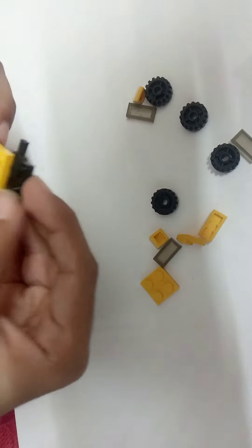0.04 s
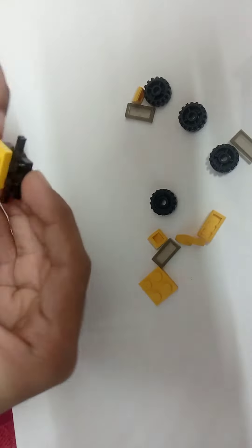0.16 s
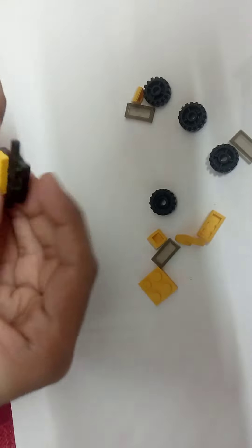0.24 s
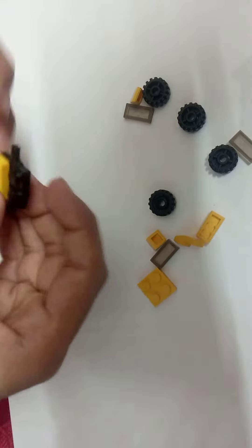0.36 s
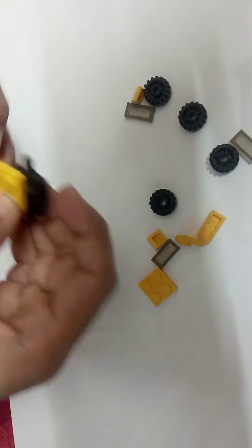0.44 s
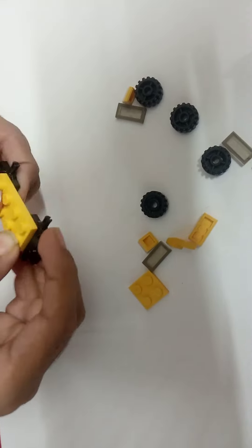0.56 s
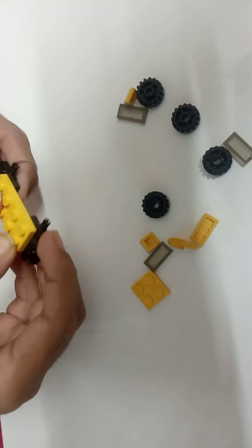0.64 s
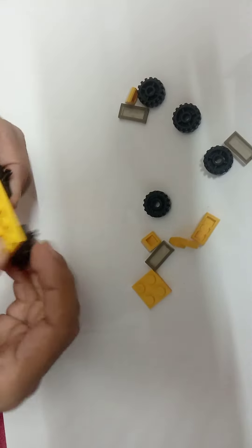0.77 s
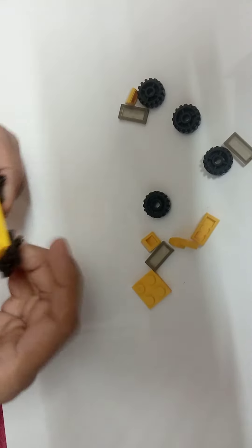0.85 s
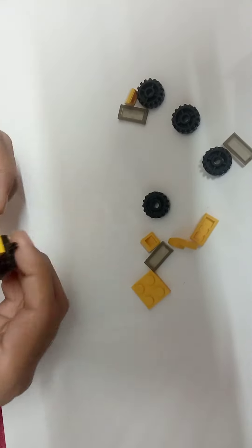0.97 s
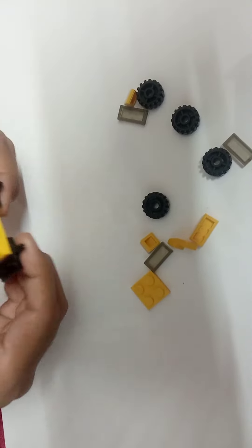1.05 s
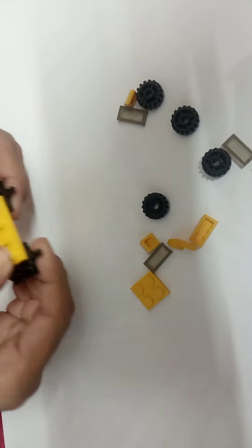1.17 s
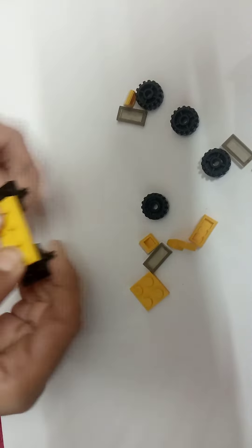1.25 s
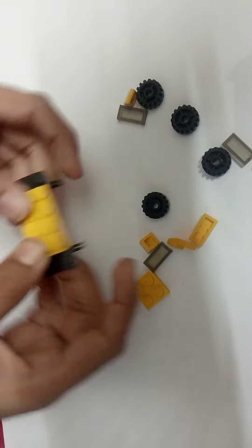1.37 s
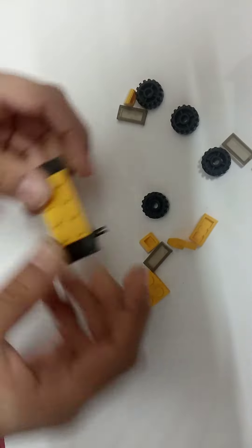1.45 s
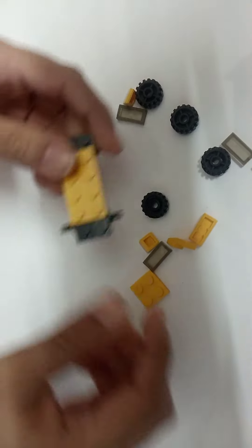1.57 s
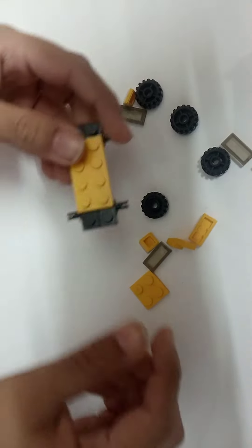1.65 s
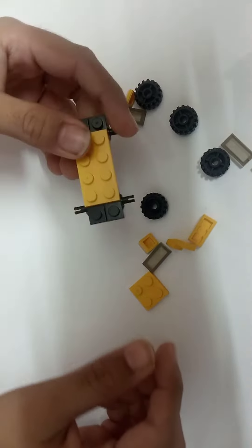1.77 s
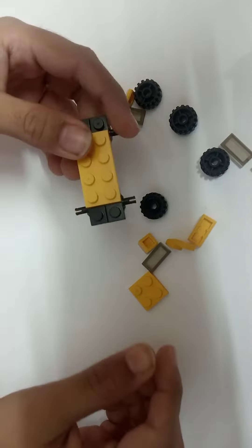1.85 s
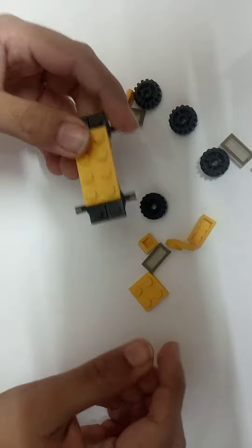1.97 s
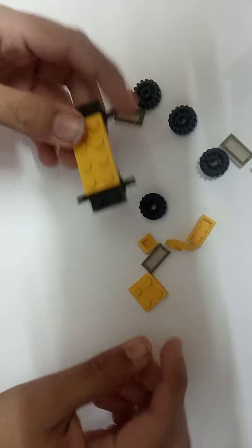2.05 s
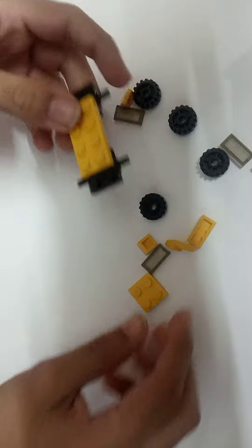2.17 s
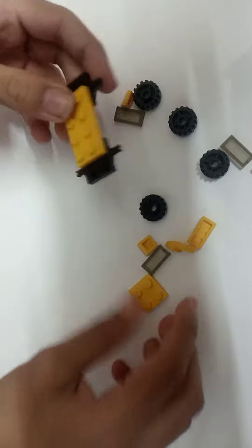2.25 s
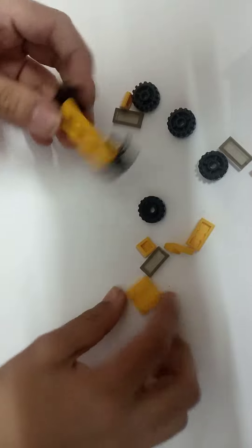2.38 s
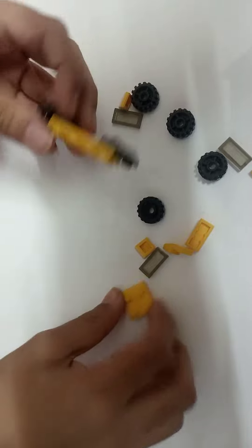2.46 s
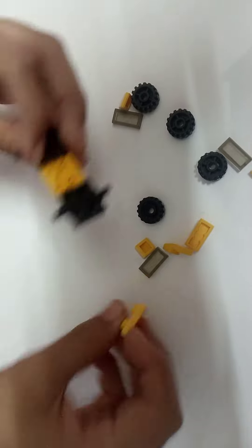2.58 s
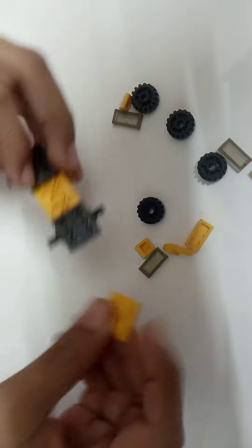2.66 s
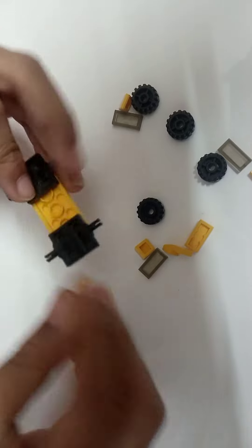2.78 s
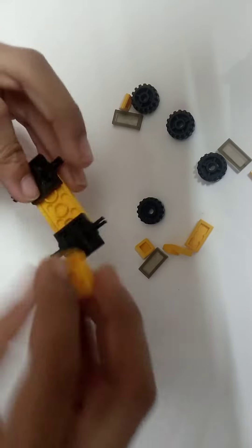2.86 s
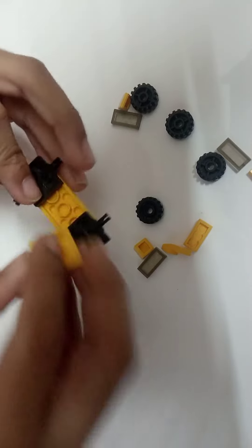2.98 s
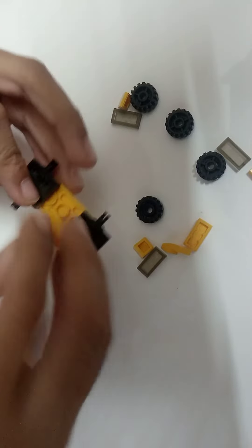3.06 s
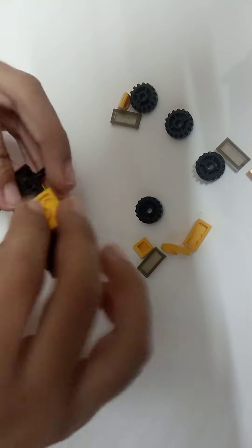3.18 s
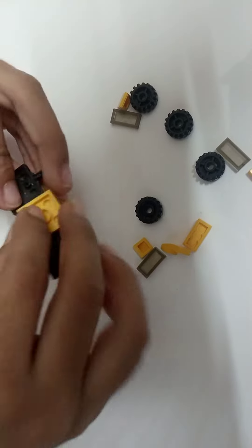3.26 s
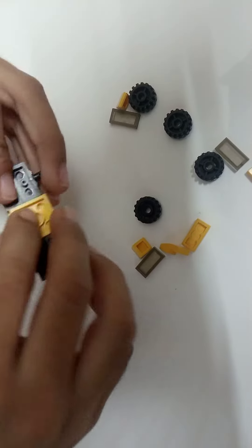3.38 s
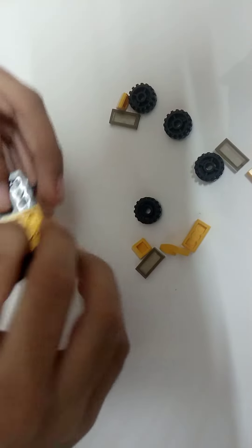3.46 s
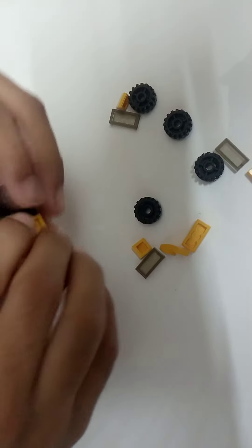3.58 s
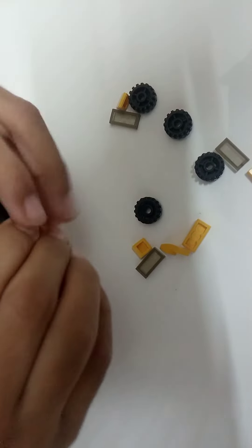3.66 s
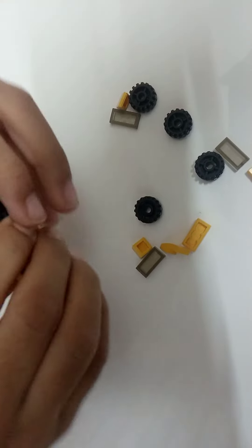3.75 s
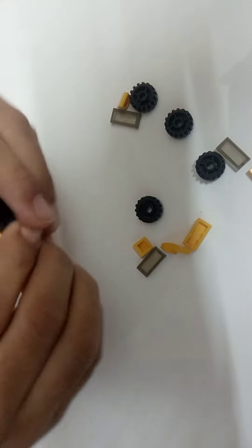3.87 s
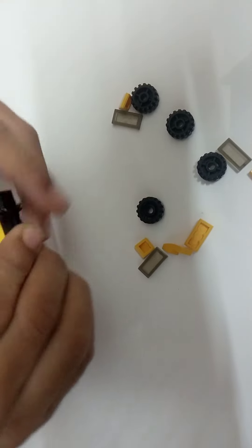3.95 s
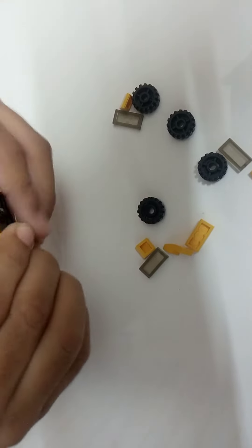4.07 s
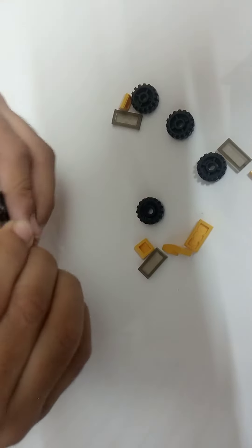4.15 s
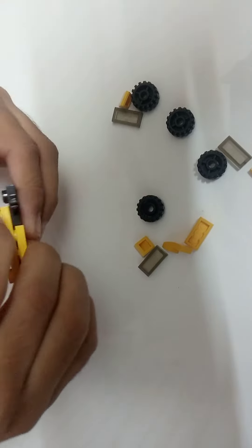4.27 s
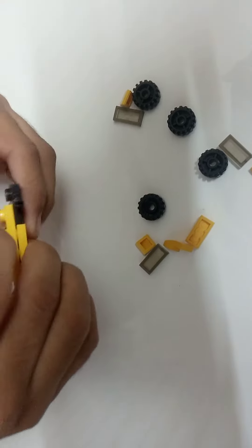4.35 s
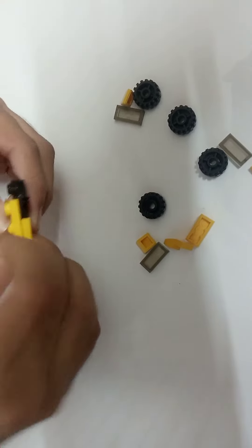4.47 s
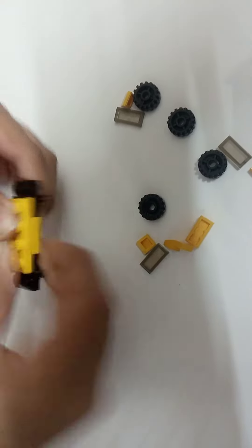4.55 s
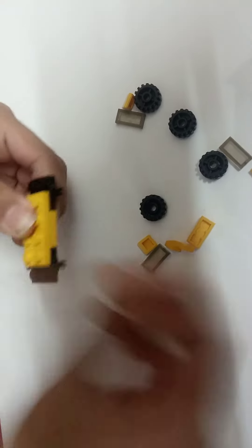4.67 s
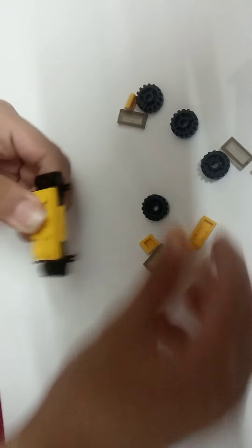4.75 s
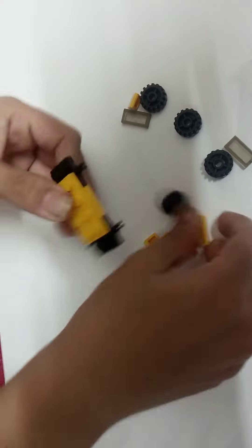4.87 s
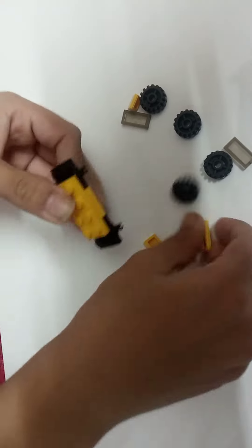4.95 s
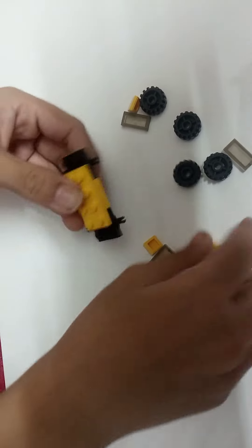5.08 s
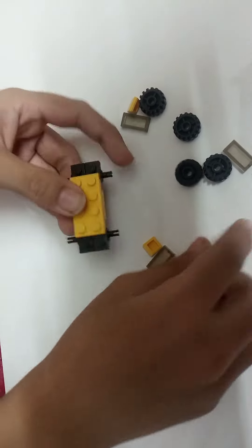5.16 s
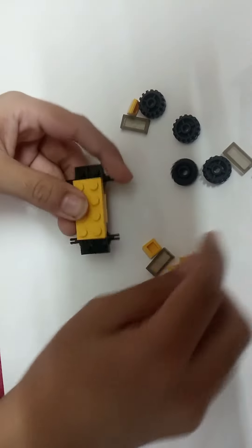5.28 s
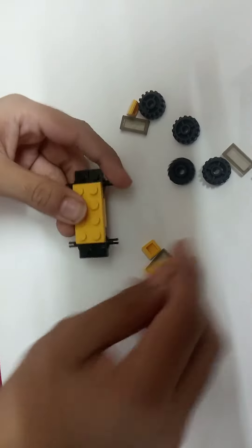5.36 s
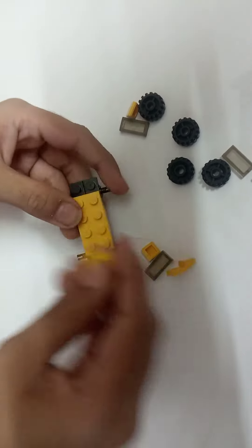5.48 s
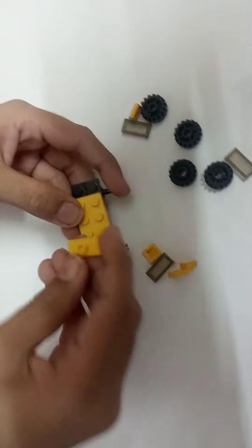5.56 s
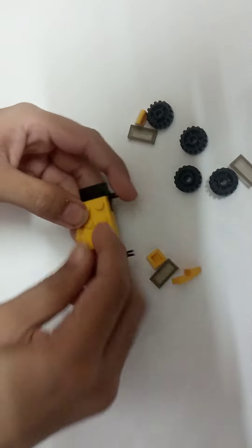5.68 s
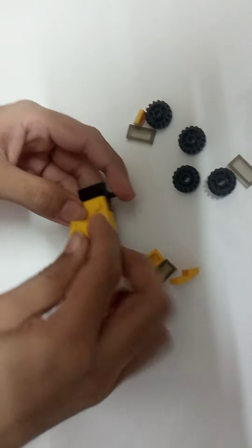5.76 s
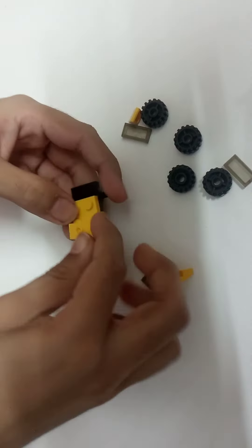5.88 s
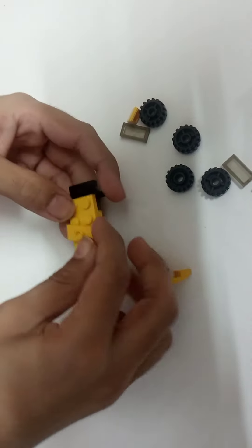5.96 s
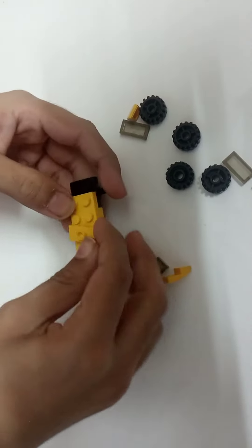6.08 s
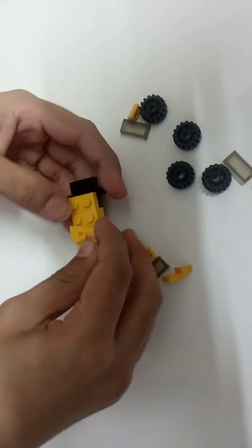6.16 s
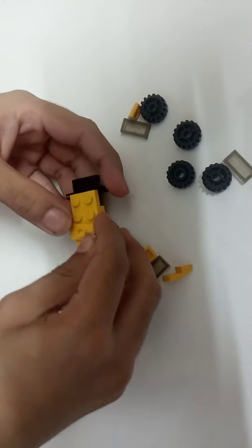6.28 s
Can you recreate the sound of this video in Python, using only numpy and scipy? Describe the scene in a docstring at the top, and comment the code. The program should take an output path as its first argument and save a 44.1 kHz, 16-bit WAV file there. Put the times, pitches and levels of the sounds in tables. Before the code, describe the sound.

Close to the microphone in a small quiet room, hands press plastic toy bricks together. Two sharp snaps open, then mostly faint clicks over a low hum and soft hand rumble. Around the middle come firmer snaps and a tiny squeak. Later, loose pieces clatter brightly on the tabletop, a plate bounces and chatters, a small wheel rocks to a stop, and two softer snaps follow.

```python
"""Toy bricks on a table

Hands press small plastic bricks together in a quiet room: studs snap as short noise cracks with a choked ring.
Loose pieces then clatter: each contact joins a brief crack to a burst of resonant tabletop noise.
A plate bounces and chatters to rest, a toy wheel rocks in shortening swings to a shudder.
Below lie soft squeaks, rubs and low bumps, a low electric hum, rumble and a thin high whine.
"""
import sys
import numpy as np
from scipy import signal
from scipy.fft import rfft, irfft, next_fast_len
from scipy.io import wavfile
from scipy.ndimage import uniform_filter1d, map_coordinates

SR = 44100
rng = np.random.default_rng(int(sys.argv[2]) if len(sys.argv) > 2 else 0)


def inscribe(sig):
    """Save sig as 16-bit PCM at rate SR to the path in sys.argv[1].

    A 1-D sig is mono; a 2-D sig holds one channel per row.
    Samples are clipped to [-1, 1] before scaling.
    """
    pcm = np.round(np.clip(np.atleast_2d(sig).T, -1, 1) * 32767)
    wavfile.write(sys.argv[1], SR, pcm.astype(np.int16))


N = 278928  # samples

# Background rumble. Each row: time in seconds, level in dB before RUMBLE_TRIM_DB.
RUMBLE_LEVEL = [(0.0, -70), (0.16, -66.5), (0.48, -72.5), (0.61, -68), (1.09, -62.5), (1.81, -67),
                (2.53, -61), (2.96, -67), (6.25, -70), (6.32, -75.5)]
# Rumble of moving hands. Each row: time in seconds, level in dB before HANDS_TRIM_DB and flutter.
HAND_MOTION_LEVEL = [(0.0, -76.5), (0.98, -82), (1.25, -66), (1.81, -64), (1.94, -71.5), (2.57, -62),
                     (2.96, -66.5), (3.01, -72), (3.38, -65.5), (3.55, -80), (4.37, -65), (4.7, -81),
                     (4.86, -64.5), (4.96, -91), (5.53, -70.5), (5.58, -90), (6.25, -76), (6.32, -91)]
# High whine. Each row: time in seconds, level in dB before its waver.
WHINE_LEVEL = [(0, -89.5), (.6, -85), (2.6, -84.5), (4.2, -83.5), (4.7, -88), (6.32, -93.5)]
# Brief dips of hum and rumble. Each row: start in seconds, length in seconds, depth in dB.
BACKGROUND_DIPS = [(0.361, .17, -12), (.67, 0.25, -7), (2.94, 0.28, -8), (4.703, 0.085, -8.5),
                   (4.866, 0.18, -8)]
# Electric hum. Each row: frequency in Hz, level in dB relative to HUM_DB, waver in dB.
HUM_PARTIALS = [(147.1, 0, 0.24), (194, -6, 2.5)]
# Spectrum of the room's rumble. Each row: frequency in Hz, relative density in dB per Hz.
RUMBLE_SPECTRUM = [(20, -37.5), (45, -18), (70, -13), (100, 0), (130, 2), (175, -5), (240, -21),
                   (330, -33.5), (600, -64)]
# Spectrum of the hands' rumble. Each row: frequency in Hz, relative density in dB per Hz.
HANDS_SPECTRUM = [(90, -31.5), (160, -5), (210, 6.5), (250, -2), (290, -13), (345, -31), (600, -68)]
# Spectrum of the hiss. Each row: frequency in Hz, relative density in dB per Hz.
HISS_SPECTRUM = [(100, 3), (400, -0.5), (800, -8), (2000, -10.5), (6000, -13), (8000, -17), (15000, -17.5)]
# Decay of the room's tail. Each row: frequency in Hz, T60 in seconds.
TAIL_T60 = [(500, 0.6), (2800, 0.18), (5000, 0.27), (9000, 0.2), (12000, 0.2), (15000, 0.14)]
# Colour of the room's echo and tail. Each row: frequency in Hz, gain in dB.
ROOM_COLOUR = [(500, -5), (3000, 0), (6000, -2), (9500, 0), (12500, -10), (16000, -14)]
# Faint squeaks. Each row: start in seconds, length in seconds, centre in Hz, level in dB.
FAINT_SQUEAKS = [(.44, 0.085, 2170, -83.5), (.515, 0.048, 2106, -84.5), (1.28, 0.11, 7340, -82.5),
                 (2.76, 0.087, 10400, -85), (2.9, 0.081, 7450, -87), (2.99, 0.11, 7400, -74.5),
                 (3.49, 0.19, 2816, -83.5), (3.49, 0.2, 3900, -89.5), (3.52, 0.14, 1934, -84),
                 (3.55, 0.13, 4600, -91), (3.54, 0.18, 1280, -80.5), (3.66, 0.077, 6490, -84)]
# Short noise swells: fingers rubbing over bricks, and the hollow knock of one snap.
# Each row: start in seconds, length in seconds, centre in Hz, level in dB.
SHORT_SWELLS = [(.135, 0.072, 4200, -76), (1.18, 0.068, 14500, -74.5), (1.2, 0.039, 5950, -80),
                (3.379, 0.00766, 2986, -47.5), (4.06, 0.037, 5080, -75), (4.167, 0.028, 4630, -69),
                (4.49, 0.021, 6700, -69)]
# Soft low bumps: hands, and the low body of a snap and a tap.
# Each row: start in seconds, length in seconds, centre in Hz, level in dB.
LOW_BUMPS = [(.57, 0.12, 60, -63.5), (1.02, 0.155, 62, -62), (1.7, .2, 58, -69), (2.328, 0.031, 640, -70.5),
             (2.37, .14, 51.5, -63.5), (4.252, 0.013, 1290, -63.5), (4.768, 0.036, 540, -59)]
# Tabletop resonances. Each row: frequency in Hz, nominal width in Hz before WIDTH_SCALE, relative level in dB.
TABLE_MODES = [(1060, 60, -20), (1190, 120, -17), (1640, 110, -15), (2260, 30, -11), (2520, 30, -6),
               (2830, 24, -15), (3300, 50, 0), (3461, 30, -3), (3752, 50, -1), (4120, 100, -1),
               (4470, 80, -5), (5120, 32, 1), (5415, 55, -1), (5830, 45, -3), (6250, 61, -6),
               (6610, 150, -3), (7195, 34, -2), (7440, 60, -1), (7811, 40, -1), (7940, 82, -5),
               (8830, 410, -1), (9581, 40, -1), (9820, 430, -2), (10500, 220, -5), (11300, 39, -10),
               (11700, 41, -12)]
# Radiation of a contact. Each row: frequency in Hz, gain in dB.
CONTACT_RADIATION = [(150, -27), (400, -36.5), (900, -22.5), (1200, -14.5), (2000, -7.5), (2900, -9),
                     (3400, 1.5), (9000, 11.5), (16000, 2.5)]
# Duller, longer part of the tabletop's ring. Each row: frequency in Hz, gain in dB.
DULL_RING_COLOUR = [(1000, -16), (2500, -0.5), (4000, -9), (7000, -4), (9500, -18), (13000, -26)]
# Single hard contacts on the table: loose pieces, the chattering plate and the rocking wheel.
# Each row: start in seconds, level in dB before a common trim, board gain in dB, sharp edge gain in dB.
TABLE_CONTACTS = [(2.241, -64, 17.5, -10), (2.3335, -53.5, 9, -22), (4.7705, -27, -6.5, 15.5),
                  (4.7747, -33, 4.5, 10), (4.7874, -43, -4.5, -5.5), (4.805, -43, 6, 3.5),
                  (4.8247, -37.5, 4, -1), (4.8268, -34.5, 0, -0.5), (5.197, -43.5, -3, -16),
                  (5.2817, -42.5, -5, -10), (5.3778, -49.5, 8.5, -2)]
# The wheel's last shudder. Each row: start in seconds, length in seconds, centre in Hz, level in dB.
WHEEL_SHUDDER = [(5.365, 0.027, 4730, -50.5)]
# Plate landings. Each row: flat blow in seconds, level in dB before a common trim, lead of the corner
# in seconds, corner level in dB relative to the blow, delay of the first rebound in seconds,
# rebound level in dB relative to the blow, brightness in dB before scaling and offset.
PLATE_LANDINGS = [(4.878, -27, 0.059, -31, .0031, -7, -4.5), (4.9373, -27, 0.017, -10, 0.011, -4, 0.5),
                  (5.0013, -24, 0.008, -4, 0.015, -13, 2.5), (5.0524, -27, .0103, -3.5, 0.0052, -3.5, 2.5),
                  (5.0962, -28.5, .0131, -8.5, .0061, 0.5, 3), (5.136, -30.5, 0.012, -8.5, 0.00592, -6, 2)]
# Studs snapping in the hand. Each row: snap in seconds, level in dB before the room,
# ring in Hz, hollow body in dB, sharp edge in dB; body and edge are offset per band.
STUD_SNAPS = [(0.1244, -48, 6450, -8, -10.5), (0.127, -31, 6400, -14, -3.5), (0.15, -35, 5780, -14, -8),
              (0.2948, -66, 8830, -17.5, -16), (0.715, -70.5, 9260, -31, -8.5),
              (0.802, -77.5, 8300, -15, -9), (1.211, -66.5, 8740, -13, 2.5),
              (1.3363, -71.5, 7190, -31, -21), (3.127, -55.5, 6530, -20, -25),
              (3.1485, -53, 5800, -12.5, -25), (3.2392, -34, 6490, -32.5, -13),
              (3.3824, -36.5, 5580, -11.5, -18), (4.0683, -57.5, 5080, -21, -42),
              (4.174, -62.5, 6300, -1.5, 0.5), (4.1785, -49, 5630, -5, -12.5),
              (4.2552, -47, 5130, -6.5, -13), (4.5002, -65.5, 6630, -5.5, -9),
              (4.5069, -61, 6600, -19.5, -18), (4.5553, -62, 8600, -17, -4), (5.7979, -45, 6660, -19.5, -3),
              (5.8928, -51, 6840, -29.5, -10)]

HUM_DB, HANDS_TRIM_DB, RUMBLE_TRIM_DB, HANDS_FLUTTER_DB = -62, 5, 4, 2
TOP_HZ, ECHO_RISE_S = 16350, .009
TICK_S, TICK_DB = .497, -56
WIDTH_SCALE = 0.16
BRIGHT_T60_S, DULL_T60_S = .05, .125
ATTACK_SPAN_S, BOARD_DB = .005, -2.5
ROCK_START_S, ROCK_SWING_S, ROCK_SHRINK = 5.2565, .026, .885  # each swing is ROCK_SHRINK of the one before
ROCK_DB, ROCK_TOUCH_S = -50, .008
SECOND_REBOUND_S, SECOND_REBOUND_DB = .0086, -9  # after and relative to the first rebound
PLATE_BOARD_DB, CORNER_EDGE_DB, EDGE_PER_BRIGHTNESS = 4.5, -8.5, 5.2
SPIKE_T60_S, RING_T60_S, CHOKE_S = .001, .019, .0034
RING_DB, RING_PEAK_DB = -12, 5


def amp(db):
    """Decibels to gain."""
    return 10 ** (np.asarray(db) / 20)


def unit(x):
    """Scale to rms 1."""
    return x / np.sqrt(np.mean(x ** 2) + 1e-30)


def along(points, hz):
    """Read (Hz, value) points on a log axis."""
    f, v = np.transpose(points)
    return np.interp(np.log(hz + 1), np.log(f + 1), v)


def curve(rows):
    """Per-sample curve through (s, value) rows."""
    s, value = np.transpose(rows)
    return np.interp(np.arange(N) / SR, s, value)


def wobble(rate_hz):
    """Smooth random curve with rate_hz knots a second."""
    knots = rng.standard_normal(int(N * rate_hz / SR) + 4)
    return map_coordinates(knots, [np.arange(N) * rate_hz / SR])


def filtered(x, response):
    """Multiply the spectrum of x by a response of frequency."""
    size = next_fast_len(len(x) + 8192)
    spectrum = rfft(x, size) * response(np.fft.rfftfreq(size, 1 / SR))
    return irfft(spectrum, size)[:len(x)]


def noise(spectrum):
    """Steady noise of rms 1 with the given spectrum."""
    return unit(filtered(rng.standard_normal(N), lambda hz: amp(along(spectrum, hz))))


def coloured(x, points, size=1024):
    """Minimum-phase colouring: causal, so an attack stays sharp."""
    gain = amp(along(points, np.fft.rfftfreq(size, 1 / SR)))
    cepstrum = irfft(np.log(gain))
    cepstrum[1:size // 2] *= 2
    cepstrum[size // 2 + 1:] = 0
    impulse = irfft(np.exp(rfft(cepstrum)))
    return signal.fftconvolve(x, impulse)[:len(x)]


def fade(t, t60):
    """Free decay by 60 dB in t60."""
    return np.exp(-np.log(1000) * t / t60)


def levelled(x, span_s):
    """Scale a hit so that its first span_s seconds have rms 1."""
    return x / np.sqrt(np.mean(x[:int(span_s * SR)] ** 2))


def add(track, s, x):
    """Mix x into the track at time s."""
    part = track[round(s * SR):][:len(x)]
    part += x[:len(part)]


def swells(rows, relative_width):
    """Short swells of narrow noise; the bandwidth is proportional to the centre frequency."""
    out = np.zeros(N)
    for s, length_s, centre_hz, db in rows:
        shape = np.hanning(int(length_s * SR))
        width_hz = relative_width * centre_hz
        band = filtered(rng.standard_normal(len(shape)),
                        lambda hz: 1 / (1 + ((hz - centre_hz) / width_hz) ** 4))
        add(out, s, amp(db) * shape * unit(band))
    return out


def hum():
    """Electric hum: sine lines wavering in level and phase."""
    t, out = np.arange(N) / SR, np.zeros(N)
    for hz, db, waver_db in HUM_PARTIALS:
        gain = amp(HUM_DB + db + waver_db * wobble(6.9))
        out += gain * np.sin(2 * np.pi * hz * t + 0.17 * wobble(2.8))
    return np.sqrt(2) * out


def rumble():
    """Low noise of the room and of moving hands, each with its own spectrum and level curve."""
    room_db = curve(RUMBLE_LEVEL) + RUMBLE_TRIM_DB
    hands_db = curve(HAND_MOTION_LEVEL) + HANDS_TRIM_DB + HANDS_FLUTTER_DB * wobble(7)
    return amp(room_db) * noise(RUMBLE_SPECTRUM) + amp(hands_db) * noise(HANDS_SPECTRUM)


def whine():
    """Thin high sine, wavering in level."""
    db = curve(WHINE_LEVEL) + 1.5 * wobble(8)
    return np.sqrt(2) * amp(db) * np.sin(2 * np.pi * 15625 * np.arange(N) / SR)


def background():
    """Hum and rumble dip briefly together; the whine does not."""
    dip_db = np.zeros(N)
    for s, length_s, depth_db in BACKGROUND_DIPS:
        add(dip_db, s, depth_db * np.hanning(int(length_s * SR)))
    return amp(dip_db) * (hum() + rumble()) + whine()


def room(x, echo_db, tail_db):
    """Nearby walls answer with a dull, scattered echo and a short diffuse tail, both delayed 12 ms."""
    hz, t, z = signal.stft(rng.standard_normal(SR // 2), SR, nperseg=256)
    decay = fade(t, along(TAIL_T60, hz)[:, None])
    tail = signal.istft(z * decay * amp(along(ROOM_COLOUR, hz))[:, None], SR, nperseg=256)[1]
    age = np.arange(len(tail)) / SR
    echo = coloured(rng.standard_normal(len(tail)) * age * fade(age, ECHO_RISE_S), ROOM_COLOUR)
    answer = amp(tail_db) * tail / np.linalg.norm(tail) + amp(echo_db) * echo / np.linalg.norm(echo)
    delayed = np.pad(x, (int(.012 * SR), 0))
    return x + signal.fftconvolve(delayed, answer)[:N]


def tick():
    """One faint, dull tick: a bare decaying pulse."""
    out, t = np.zeros(N), np.arange(SR // 100) / SR
    add(out, TICK_S, amp(TICK_DB) * fade(t, 0.004))
    return out


def soft_swells():
    """Narrow squeaks, wider short rubs with one hollow knock, and soft low bumps, all as noise swells."""
    squeaks = swells(FAINT_SQUEAKS, relative_width=0.017)
    rubs_and_knock = swells(SHORT_SWELLS, relative_width=.3)
    bumps = swells(LOW_BUMPS, relative_width=.35)
    return squeaks + rubs_and_knock + bumps


def table_ring():
    """Steady noise with the tabletop's resonances and the dark valleys between them."""
    hz = np.fft.rfftfreq(8192, 1 / SR)
    centre, width, db = np.transpose(TABLE_MODES)[:, :, None]
    peaks = amp(db) ** 2 / (1 + ((hz - centre) / (WIDTH_SCALE * width)) ** 2) ** 2
    floor = amp(-24.0 + along(CONTACT_RADIATION, hz))
    shape = np.sqrt(np.sum(peaks, axis=0)) + floor
    return unit(filtered(rng.standard_normal(N), lambda f: np.interp(f, hz, shape)))


def blow(ring, board_db, piece_db, edge_db):
    """One contact: the piece cracks briefly and the tabletop rings on, its dull part longest."""
    t = np.arange(SR // 4) / SR
    start = rng.integers(N - len(t))  # random slice of the ring noise
    modes = ring[start:start + len(t)]
    board = modes * fade(t, BRIGHT_T60_S) + coloured(modes, DULL_RING_COLOUR) * fade(t, DULL_T60_S)
    burst = rng.standard_normal(len(t)) * (fade(t, .0025) + amp(-12) * fade(t, .02))
    crack = coloured(burst, CONTACT_RADIATION)
    hit = levelled(crack, ATTACK_SPAN_S) + amp(BOARD_DB) * levelled(board, ATTACK_SPAN_S)
    # (Hz, gain dB)
    balance = [(3800, board_db - 0.5), (6300, 0.0023), (9200, piece_db),
               (12000, (piece_db + edge_db) / 2 - 3.5), (15000, edge_db + 4)]
    return coloured(hit, balance)


def hard_contacts(ring):
    """Single hard contacts on the table: loose pieces, the chattering plate and the rocking wheel."""
    out = np.zeros(N)
    for s, db, board_db, edge_db in TABLE_CONTACTS:
        hit = blow(ring, board_db, piece_db=-10, edge_db=edge_db)
        add(out, s, amp(db - 1.36) * levelled(hit, span_s=0.0046))
    return out


def wheel(ring, count=8):
    """Each swing of the rubber-rimmed wheel is a damped swell of tiny contacts; swings shorten to a shudder."""
    out, swell = np.zeros(N), np.hanning(int(ROCK_TOUCH_S * SR))
    swings = (1 - ROCK_SHRINK ** np.arange(count)) / (1 - ROCK_SHRINK)
    for s in ROCK_START_S + ROCK_SWING_S * swings:
        contacts = swell * rng.standard_normal(len(swell)) ** 3  # cubed: a few contacts stand out
        touch = blow(ring, board_db=5.5, piece_db=-19.5, edge_db=-18)
        damped = touch * fade(np.arange(len(touch)) / SR, 0.22)
        roll = signal.fftconvolve(damped, contacts)
        hub = coloured(roll, [(5600, 1.0), (6800, 8.0), (8000, 5.5), (11000, 9.5), (14000, 5.5)])
        add(out, s, amp(ROCK_DB) * levelled(hub, span_s=0.0058))
    return out + swells(WHEEL_SHUDDER, relative_width=.3)


def chatter(ring, start_s, end_s, first_db, last_db, count=22):
    """The plate chatters to rest in quick, irregular bounces that weaken on average."""
    out = np.zeros(N)
    times = np.linspace(start_s, end_s, count) + 0.0011 * rng.standard_normal(count)
    levels_db = np.linspace(first_db, last_db, count) + 3 * rng.standard_normal(count)
    for s, db in zip(times, levels_db):
        hit = blow(ring, board_db=7, piece_db=1.5, edge_db=-18.5)
        add(out, s, amp(db) * levelled(hit, span_s=0.013))
    return out


def plate(ring):
    """A small plate bounces; each landing is a glancing corner, the flat blow and two quick rebounds."""
    out = np.zeros(N)
    for s, db, ahead_s, corner_db, after_s, rebound_db, bright_db in PLATE_LANDINGS:
        # (delay s, relative level dB, edge dB before brightness)
        contacts = [(-ahead_s, corner_db, CORNER_EDGE_DB), (0, 0, 0), (after_s, rebound_db, -2),
                    (after_s + SECOND_REBOUND_S, rebound_db + SECOND_REBOUND_DB, 1)]
        for delay_s, contact_db, edge_db in contacts:
            bright_edge_db = edge_db + EDGE_PER_BRIGHTNESS * bright_db - 7.5
            hit = blow(ring, PLATE_BOARD_DB, piece_db=bright_db + 2.0, edge_db=bright_edge_db)
            add(out, s + delay_s, amp(db + contact_db - 1.0) * levelled(hit, span_s=0.0045))
    return out


def snaps():
    """A stud snaps with a sharp spike after a very faint noise rise; the ring is choked within milliseconds."""
    out, t = np.zeros(N), np.arange(SR // 20) / SR
    lead = t[:SR // 100]
    choke = 1 / (1 + (t / CHOKE_S) ** 6)
    ring = amp(RING_DB) * fade(t, RING_T60_S) * choke
    envelope = fade(t, SPIKE_T60_S) + ring + amp(-24.5) * fade(t, 0.027)
    for s, db, ring_hz, body_db, edge_db in STUD_SNAPS:
        crack = rng.standard_normal(len(t)) * envelope
        rise = amp(-29.5) * rng.standard_normal(len(lead)) * fade(lead, .016)[::-1]
        # (Hz, gain dB): hollow body, ring, sharp edge
        shell = [(700, body_db - 28), (1250, body_db - 17), (2100, body_db - 7.0), (3000, body_db + 3),
                 (0.99 * ring_hz, -3), (ring_hz, RING_PEAK_DB), (1.35 * ring_hz, -5),
                 (11500, edge_db - 2), (14000, edge_db), (16500, edge_db + 1.5)]
        click = coloured(np.concatenate([rise, crack]), shell)
        attack = click[len(lead):][:SR // 200]
        add(out, s - len(lead) / SR, amp(db) * click / np.std(attack))
    return out


def scene():
    """Bricks in the hand and on the table, in the room."""
    ring = table_ring()
    held = room(snaps(), echo_db=-18, tail_db=-18.5)
    settling = chatter(ring, start_s=5.145, end_s=5.244, first_db=-52.0, last_db=-60.5)
    pieces = hard_contacts(ring) + plate(ring) + wheel(ring) + settling
    loose = room(pieces, echo_db=-21, tail_db=-26)
    return (background() + tick() + soft_swells() + loose + held)[None]


def suppressor(x, threshold_db, size=512):
    """Noise suppression: bands near or below the threshold are turned down, which cuts faint tails short."""
    z = signal.stft(x, nperseg=size)[2]
    power = np.abs(uniform_filter1d(np.abs(z) ** 2, 3, axis=0) * size)
    gain = power / (power + amp(threshold_db) ** 2)
    return signal.istft(z * gain, nperseg=size)[1][:N]


def record(dry):
    """Suppress faint sound, add steady hiss, cut steeply above TOP_HZ."""
    heard = suppressor(dry[0], threshold_db=-80.0) + amp(-86.5) * noise(HISS_SPECTRUM)
    return filtered(heard, lambda hz: 1 / (1 + (hz / TOP_HZ) ** 120))[None]


dry = scene()
out = record(dry)
inscribe(out)
```